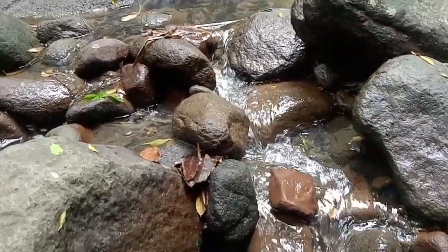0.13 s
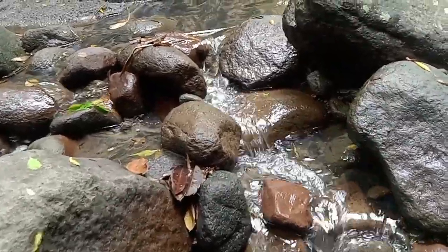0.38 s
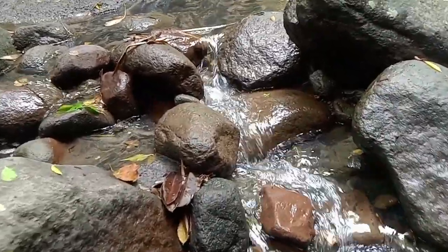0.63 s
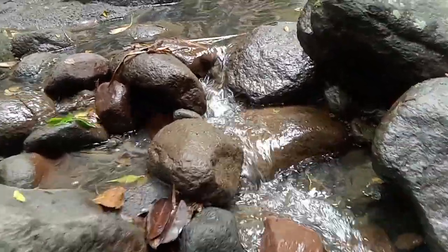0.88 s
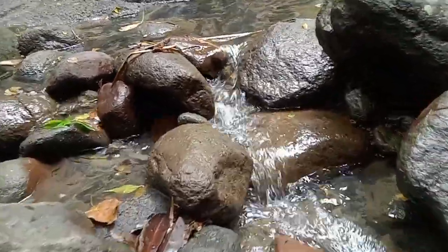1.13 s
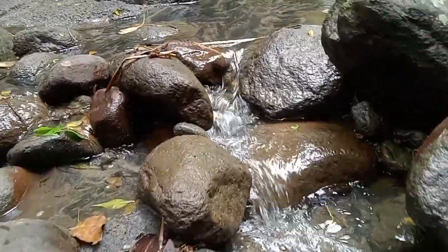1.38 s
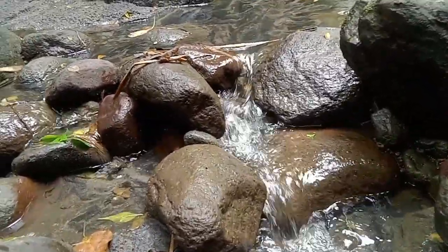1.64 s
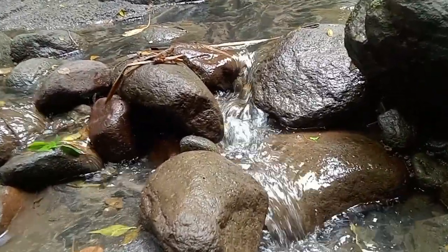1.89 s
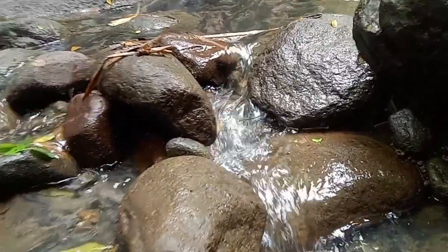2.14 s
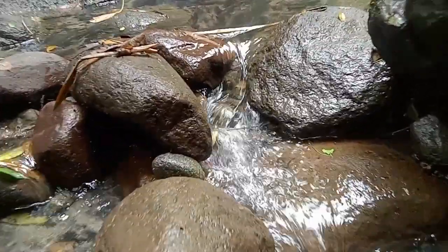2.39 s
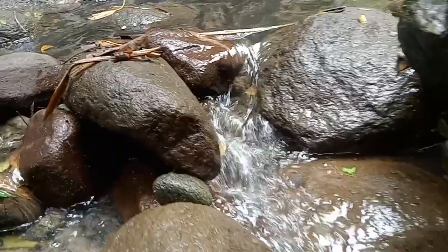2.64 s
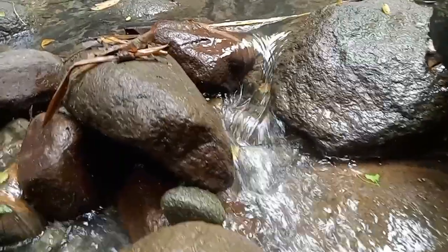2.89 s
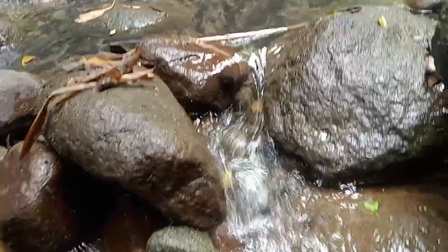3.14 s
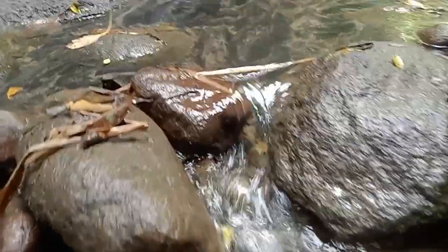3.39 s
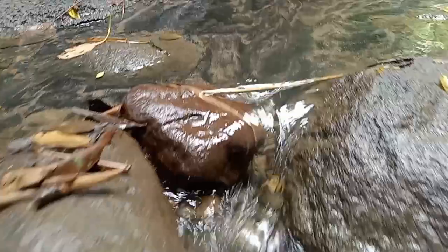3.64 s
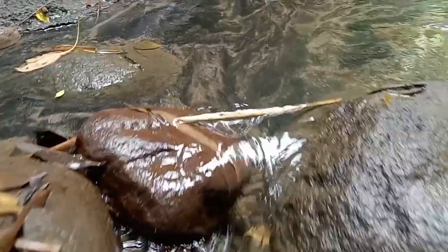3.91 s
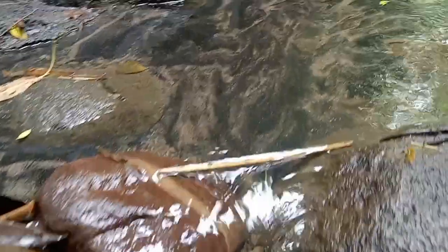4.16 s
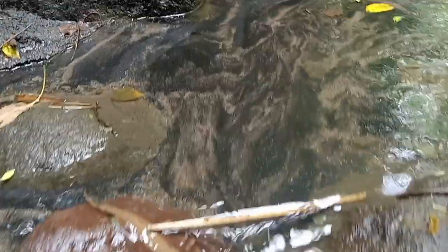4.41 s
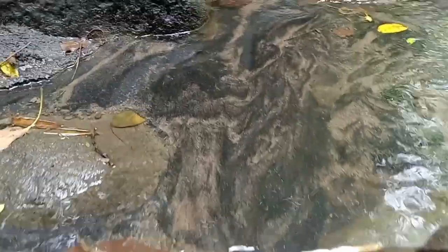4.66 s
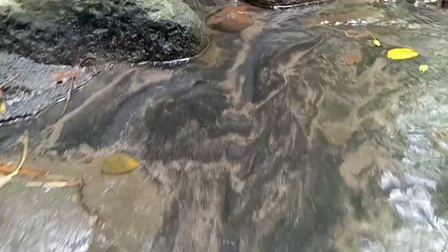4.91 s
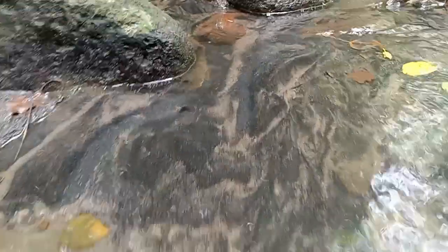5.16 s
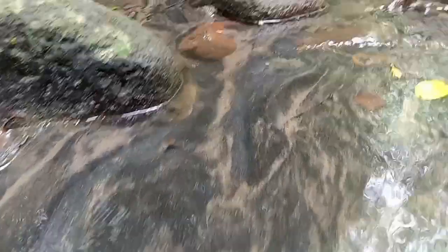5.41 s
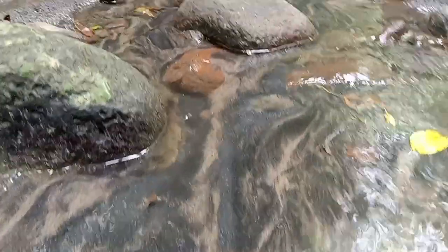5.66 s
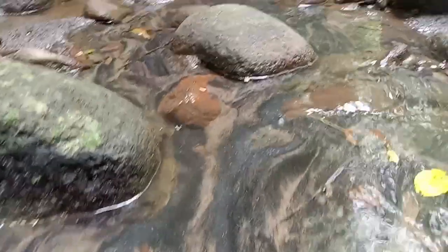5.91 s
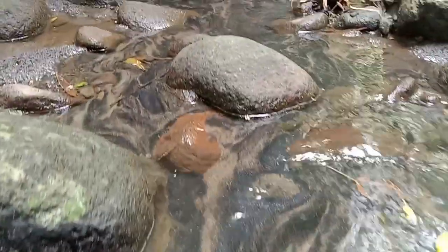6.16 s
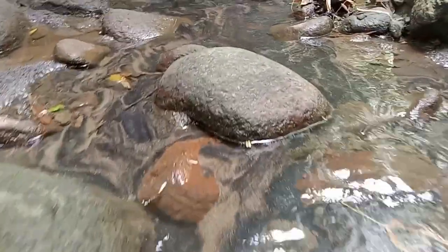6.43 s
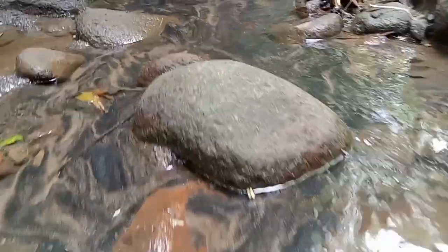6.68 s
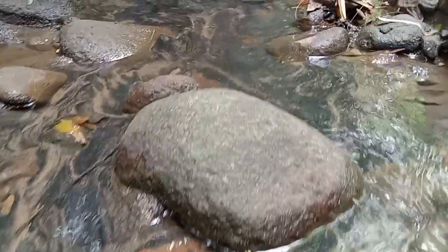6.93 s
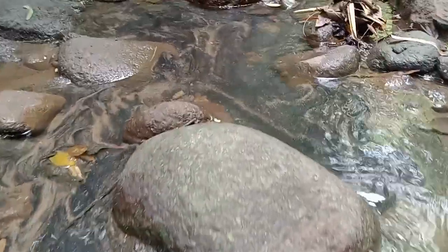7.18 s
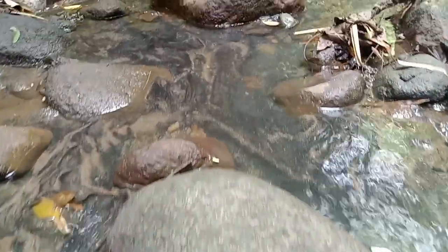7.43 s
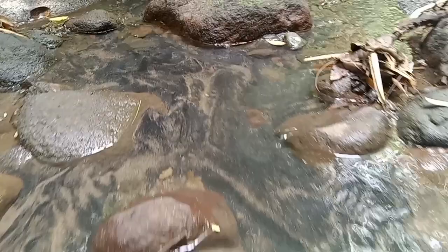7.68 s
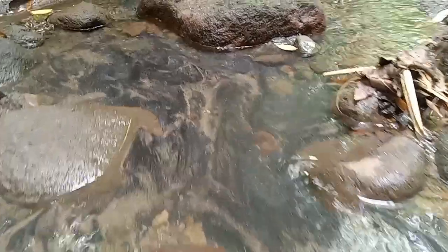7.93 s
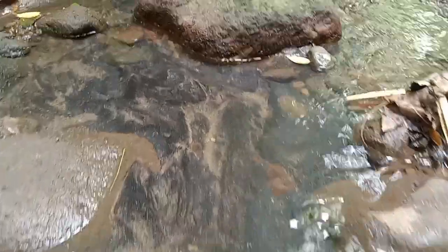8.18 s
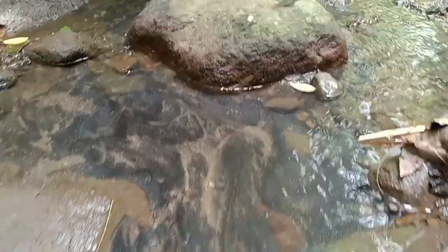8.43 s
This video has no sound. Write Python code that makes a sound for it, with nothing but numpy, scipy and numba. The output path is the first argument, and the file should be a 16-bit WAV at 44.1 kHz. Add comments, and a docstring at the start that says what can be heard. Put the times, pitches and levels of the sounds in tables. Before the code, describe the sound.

Close, low microphone carried up a shallow rocky brook outdoors. Quick glassy bubble tones and ticks trickle irregularly, with rounder plops joining as a little fall is passed. A dense, loud clatter of splashes and gulps peaks after the middle, then drops away to calm water with only occasional plinks. Soft far water noise and a steady high insect haze become easier to hear at the end.

```python
"""Bubbles of every size ring in a shallow stony stream as a small microphone is carried low up it.
It passes a little fall, then calmer water. Each bubble is a short fading tone; slops bunch them in time.
Single loud bubbles plink, and large air pockets gulp. Distant water is coloured noise.
Insects are a noisy far chorus plus thin wavering tones. A faint low hum comes and goes."""
import sys
import numpy as np
from scipy import signal
from scipy.fft import rfft, irfft
from scipy.io import wavfile
from scipy.ndimage import uniform_filter1d
from numba import njit

SR = 44100
rng = np.random.default_rng(int(sys.argv[2]) if len(sys.argv) > 2 else 0)


def boost_factor(decibels):
    """Convert a level in decibels to a linear amplitude factor."""
    exponent = np.asarray(decibels, float) / 20
    return 10 ** exponent


def materialize(psi):
    """Save the field psi as 16-bit PCM at rate SR to the path in sys.argv[1].

    A 1-D psi becomes a single channel; in a 2-D psi each row is a channel.
    """
    bounded = np.clip(np.atleast_2d(psi).T, -1, 1)
    quanta = np.round(bounded * 32767).astype(np.int16)
    wavfile.write(sys.argv[1], SR, quanta)


N = 377540  # length of the scene [samples]

# How busily the near water makes bubbles between slops, as the microphone moves along; base levels:
# (time [s], large [dB], middling [dB], small [dB], tiny [dB])
CHURN = [(0.0, -77, -38.5, -59.5, -44), (0.48, -68, -39, -49, -42), (1.0, -76.5, -38.5, -48.5, -41),
         (1.5, -57.5, -30.5, -43, -33), (2.0, -64, -41.5, -42, -43.5), (2.5, -62, -35, -50.5, -43),
         (3.1, -74.5, -36, -41, -36.5), (3.35, -62, -34, -43.5, -37.5), (3.75, -51.5, -31.5, -40.5, -35),
         (4.1, -39.5, -30, -35, -37), (4.3, -75.5, -28, -35, -34.5), (4.85, -71, -34, -38, -37.5),
         (5.0, -34.5, -31, -28, -28.5), (5.5, -59.5, -36, -29.5, -38.5), (5.95, -64, -42.5, -38, -39.5),
         (6.5, -47.5, -44, -37.5, -37), (6.75, -62.5, -43.5, -47.5, -49.5), (7.6, -65, -57, -47, -47),
         (8.0, -77.5, -54.5, -52, -57), (8.56, -78, -52, -54.5, -59.5)]
# Pitches that stand for the four sizes: (large [Hz], middling [Hz], small [Hz], tiny [Hz])
CHURN_HZ = (320, 1300, 3000, 4800)
# Slops of water over a stone, each a brief surge of bubbles, or a lull where negative:
# (peak time [s], length [s], lift of large bubbles [dB], lift of the rest [dB])
SLOPS = [(0.08, 0.05, 15, 7), (0.396, 0.078, 17, 3), (0.617, 0.1, 19, 12.5), (1.316, 0.71, -4, -3.5),
         (1.87, 0.18, 4, 12.5), (2.051, 0.065, 24.5, 14), (2.224, 0.29, 11.5, 10.5),
         (2.635, 0.061, -10, 12), (2.753, 0.12, 24, 7.5), (2.931, 0.073, 26.5, 2.5), (3.242, 0.066, 4, 5.5),
         (3.529, 0.22, 32, 11.5), (3.962, 0.078, -1, 6.5), (4.15, 0.12, 11, 2.5), (4.416, 0.29, 29, -3.5),
         (4.56, 0.053, 13, -7), (4.606, 0.047, 24.5, 1.5), (4.936, 0.044, -11, 10.5),
         (5.155, 0.074, 22.5, 4.5), (5.407, 0.17, 27.5, 4.5), (6.158, 0.13, 24.5, -1.5),
         (6.797, 0.025, 23.5, 10), (7.492, 0.017, -32, 13), (7.759, 0.22, -1, 10), (8.352, 0.042, 8, 12)]
SLOP_RISE = 0.41  # share of a slop's length spent rising
# How pitch changes the loudness of a crowd bubble: (pitch [Hz], level change [dB])
CROWD = [(150, -26), (350, -3), (800, -3.5), (2400, -1), (5500, 9), (9000, 5.5)]
LINGER = 1.7  # stretches every bubble's cycles of ring

# Colour of the distant water: (pitch [Hz], relative level [dB])
WASH = [(24, -50), (40, -20), (95, -13), (422, -21), (959, -4), (1220, -9), (1680, 1), (1960, -6),
        (3740, -6), (7000, -13), (9100, -43), (15400, -120)]
WASH_DB = -57  # overall level [dB rms]

# Colour of the far insect chorus: (pitch [Hz], relative level [dB])
CHORUS = [(4240, -39), (7200, -17), (8120, 2.5), (8710, 1.5), (9300, -2), (10400, -22), (13600, -45.5),
          (22000, -120)]
CHORUS_DB = -47  # overall level [dB rms]
# Nearer single insects, around which pitch and level waver: (pitch [Hz], peak level [dB])
SINGERS = [(7892, -61), (8140, -52.5), (8656, -53.5), (8947, -57), (9324, -61.5)]

# The loudest bubbles and air pockets, before the ring is stretched; they crest about a cycle early:
# (time [s], peak level [dB], pitch [Hz], ring [cycles])
LOUD = [(0.081, -36, 600, 14), (0.193, -32, 1115, 19), (0.197, -25.5, 2040, 19), (0.272, -18, 5100, 4.1),
        (0.3461, -31, 1150, 17), (0.526, -31.5, 737, 11), (0.5476, -18, 4840, 7), (0.6156, -13, 5870, 4.1),
        (0.79, -22.5, 5500, 26), (0.847, -30.5, 2430, 17), (0.94, -16, 5460, 5.7), (1.03, -33.5, 892, 16),
        (1.1437, -19.5, 6000, 9), (1.155, -18.5, 6200, 9.9), (1.1474, -29, 1830, 26),
        (1.158, -29.5, 1310, 16), (1.217, -32.5, 1600, 25), (1.2918, -29, 960, 30),
        (1.324, -28, 1020, 11.5), (1.437, -29.5, 3360, 30), (1.451, -20, 5450, 13), (1.559, -33, 945, 36),
        (1.872, -25, 2060, 13), (1.9363, -10, 5000, 3.9), (1.999, -31.5, 960, 23), (2.0582, -14, 2460, 3.6),
        (2.294, -32, 1030, 13), (2.461, -15.5, 6050, 19), (2.5363, -24, 1086, 34), (2.543, -43.5, 199, 5),
        (2.615, -31.5, 528, 10.6), (2.647, -22, 975, 9.1), (2.759, -15, 1250, 5.8), (2.84, -28, 746, 17.5),
        (3.2124, -26.5, 438, 2.6), (3.253, -27.5, 1426, 21), (3.301, -22.5, 1820, 13),
        (3.378, -17.5, 5320, 11), (3.409, -19, 1660, 10), (3.4144, -38, 247, 11), (3.492, -14.5, 1120, 5.5),
        (3.5074, -10.5, 2540, 4.4), (3.538, -18, 1650, 7.5), (3.5783, -18, 1040, 5),
        (3.582, -8.5, 2000, 4.9), (3.5898, -15.5, 5150, 14), (3.659, -15.5, 1950, 4.6),
        (3.66, -14, 5540, 24), (3.746, -21.5, 2530, 9.9), (3.768, -17.5, 2000, 3.6),
        (3.866, -24.5, 1270, 7.1), (3.9687, -18.5, 730, 6.5), (4.1264, -12.5, 1900, 7.9),
        (4.128, -19, 5100, 15), (4.17, -23.5, 1296, 17.7), (4.2368, -19.5, 1720, 8.4),
        (4.261, -19.5, 1630, 21), (4.3038, -26, 491, 5.3), (4.305, -24, 1710, 16.4), (4.361, -30, 2800, 12),
        (4.401, -29.5, 820, 13), (4.419, -27.5, 1100, 14), (4.451, -23, 2680, 11),
        (4.477, -27.5, 1260, 6.8), (4.496, -26, 3900, 5.8), (4.505, -18.5, 4000, 5.5),
        (4.618, -16, 4430, 9.4), (4.631, -16, 2500, 5), (4.688, -29.5, 1730, 12), (4.722, -25, 720, 6),
        (4.7669, -15.5, 6400, 9.9), (4.857, -19, 3590, 24), (4.881, -21.5, 3650, 16),
        (4.927, -3.5, 3410, 5), (4.931, -15, 690, 5.9), (4.939, -25, 4940, 9.3), (4.9708, -12.5, 792, 7.6),
        (4.971, -5, 1730, 1.36), (5.036, -11, 4570, 5.6), (5.043, -23, 503, 16), (5.056, -7, 7450, 8.3),
        (5.0836, -3, 5530, 7.5), (5.1212, -12.5, 3040, 10.2), (5.1758, -7, 1820, 0.99),
        (5.1761, -9.5, 3850, 4.1), (5.197, -13.5, 1973, 21.2), (5.3405, -16.5, 520, 0.98),
        (5.349, -13, 5500, 36), (5.3513, -5.5, 588, 1.3), (5.372, -7, 4000, 3.8), (5.3727, -9, 420, 0.82),
        (5.381, -12, 5600, 20), (5.3858, -14, 370, 1.5), (5.394, -19.5, 3620, 8.8), (5.3969, -7, 536, 2.5),
        (5.4, -12, 5600, 7.3), (5.417, -24, 5300, 22), (5.522, -7.5, 3060, 8.4), (5.538, -8.5, 3900, 3.5),
        (5.5698, -2.5, 3500, 1.3), (5.5805, -5.5, 6900, 6.5), (5.611, -14.5, 3530, 8),
        (5.655, -4, 2626, 14), (5.6723, -11.5, 3800, 9.2), (5.74, -10, 3690, 4.1), (5.8568, -11, 6800, 4.8),
        (5.936, -10.5, 4680, 7.9), (6.104, -26, 1860, 3.1), (6.182, -25, 1780, 12.7),
        (6.204, -32, 1045, 16), (6.415, -28.5, 377, 2.3), (6.4845, -12, 2880, 13.4),
        (6.496, -32.5, 288, 2.8), (6.5486, -32.5, 913, 13.5), (6.784, -39, 370, 5.8),
        (6.896, -31.5, 1660, 8.2), (7.124, -40.5, 806, 31), (7.162, -41, 820, 14.7),
        (7.314, -34, 1680, 6.8), (7.42, -40.5, 1280, 18), (7.486, -20.5, 4400, 3.3),
        (7.742, -16.5, 4880, 11), (7.756, -24.5, 2260, 13), (7.77, -12, 6500, 5.8), (7.827, -20, 5340, 4.4),
        (7.91, -35, 1650, 10.5), (8.17, -43, 1520, 12), (8.277, -33, 5430, 32), (8.387, -23, 570, 1.36)]

# Air pockets gulping shut between stones, before the shared boost: (start [s], peak level [dB], pitch [Hz])
GULPS = [(0.241, -48.5, 456), (2.895, -43, 450), (3.531, -35, 277), (3.603, -29, 287), (3.66, -34.5, 380),
         (3.763, -37, 335), (3.791, -36.5, 294), (3.916, -30, 370), (3.965, -29, 335), (4.029, -34, 374),
         (4.602, -45, 335), (4.878, -32.5, 386), (5.138, -32, 427), (5.18, -27.5, 338), (5.503, -42, 308),
         (6.114, -38.5, 454), (7.734, -46, 370)]
GULP_CYCLES, GULP_RISE, GULP_DB = 1.5, 0.23, 5  # ring before stretching [cycles], swell [cycles], boost [dB]

# Swells of the low hum: (middle [s], length [s], level at the middle [dB rms])
THRUM = [(3.204, 0.068, -67), (3.454, 0.021, -55), (3.555, 0.047, -55.5), (3.946, 0.021, -53),
         (4.104, 0.16, -61.5), (4.387, 0.043, -58), (5.146, 0.19, -77), (5.425, 0.55, -65),
         (5.988, 0.19, -60.5), (6.27, 0.11, -54), (6.454, 0.069, -61.5), (7.152, 0.24, -69.5),
         (7.386, 0.22, -66.5)]

# Roll-offs of the microphone for the near water: (pitch [Hz], gain [dB])
MIC = [(30, -11.5), (120, -0.5), (300, 1), (7000, 0), (8500, 0), (9800, -13), (10800, -39.5), (12000, -63)]


def evened(x):
    """Scales to an average strength (rms) of 1."""
    return x / np.sqrt(np.mean(x ** 2) + 1e-20)


def read(points, hz):
    """Reads a curve of levels between its points, with pitch on a log scale."""
    f, value = np.transpose(points)
    return np.interp(np.log(hz + 1), np.log(f + 1), value)


def drift(count, hz):
    """Slow chance: rows of noise smoothed to about hz changes a second."""
    width = int(SR / hz)
    noise = rng.standard_normal((count, N))
    return evened(uniform_filter1d(uniform_filter1d(noise, width), width))


def hiss(spectrum, patchy_db, span_bins, span_frames):
    """Noise of a given colour with drifting louder and softer patches."""
    a, b, patches = rng.standard_normal((N // 256 + 5, 513, 3)).T
    patches = uniform_filter1d(patches, max(int(span_bins), 1), 0)  # smooth across pitch
    patches = evened(uniform_filter1d(patches, max(int(span_frames), 1), 1))  # smooth along time
    colour_db = read(spectrum, np.fft.rfftfreq(1024, 1 / SR))[:, None]
    z = (a + 1j * b) * boost_factor(colour_db + patchy_db * patches)
    return evened(signal.istft(z, nperseg=1024, noverlap=768)[1][:N])


@njit
def add(mix, start, peak, step, cycles, glide, rise):
    """Adds bubbles: sines that swell softly, fade, are cut short as they burst, and slide near the surface."""
    for k in range(len(start)):
        turns = 0.
        end = min(len(mix), start[k] + int(cycles[k] / step[k]))
        for n in range(max(start[k], 0), end):
            age = (n - start[k]) * step[k]  # in cycles
            turns += step[k] * (1 + glide[k] * age / cycles[k])
            swell = (1 - np.exp(-age / rise[k])) ** 2
            fade = np.exp(-np.pi * age / cycles[k] - (2 * age / cycles[k]) ** 4)
            mix[n] += peak[k] * swell * fade * np.sin(2 * np.pi * turns)


def ring(s, db, hz, cycles, glide, rise):
    """Sums a list of bubbles, each swelling to its level db at about its time s, then dying away."""
    mix, one = np.zeros(N), np.ones(len(s))
    cycles = np.clip(cycles * one, 1, 90)
    rise = np.clip(rise * one, .02, 30)
    cycles = LINGER * cycles + 2 * rise
    # cycles from birth to the loudest moment, and the height of the swell there
    crest = np.minimum(rise * np.log(1 + 2 * cycles / (np.pi * rise)), cycles / 3)
    height = (1 - np.exp(-crest / rise)) ** 2 * np.exp(-np.pi * crest / cycles - (2 * crest / cycles) ** 4)
    start = ((s - crest / hz) * SR).astype(np.int64)
    add(mix, start, boost_factor(db) / height, hz / SR, cycles, glide * one, rise)
    return mix


def churn(s, surge_share):
    """Base levels of the four bubble sizes at times s: the steady churn, lifted or lowered by each slop."""
    t, *levels = np.transpose(CHURN)
    peak, length, large_db, rest_db = np.transpose(SLOPS)[:, :, None]
    side = np.where(s < peak, SLOP_RISE, 1 - SLOP_RISE) * length
    surge = surge_share * np.exp(-((s - peak) / side) ** 2)
    lifts = [(db * surge).sum(0) for db in (large_db, rest_db, rest_db, rest_db)]
    return [np.interp(s, t, db) + lift for db, lift in zip(levels, lifts)]


def bubbles(count, low_hz, high_hz, spread_db, clump_db, clump_hz, cycles, share_db, pockets=0, surge_share=1):
    """A random crowd of bubbles: few are loud, they bunch in time, and the churn sets each size's level."""
    when, pitch, size, long, slide, swell = rng.random((count, 6)).T
    s, at = when * N / SR, (when * N).astype(int)
    if pockets:  # each hollow between stones sheds a chain of like-sized bubbles whose pitch wanders
        hollow = (pitch * pockets).astype(int)
        wander = 0.44 * drift(count=pockets, hz=12)[hollow, at]
        pitch = (hollow + .5 + wander) / pockets
    hz = low_hz * (high_hz / low_hz) ** pitch

    # blend the churn levels of the two nearest sizes
    place = np.interp(np.log(hz), np.log(CHURN_HZ), np.arange(len(CHURN_HZ)))
    churn_db = sum(db * np.maximum(1 - abs(place - k), 0) for k, db in enumerate(churn(s, surge_share)))

    # bunching is partly shared by all sizes, partly apart for each third of the pitch range
    slop = drift(count=4, hz=clump_hz)
    third = np.clip(3 * pitch, 0, 2).astype(int)
    clump = .92 * slop[0, at] + .4 * slop[1 + third, at]
    bunching_db = clump_db * 2.06 * np.tanh(clump / 2.39)  # extremes are held back

    big_db = -spread_db * np.log(1 - .98 * size)  # few bubbles are loud
    db = churn_db + read(CROWD, hz) + big_db + bunching_db + share_db
    cycles = cycles * np.minimum(hz / 600, 1)  # the largest bubbles ring for fewer cycles
    return ring(s, db, hz, cycles * (.5 + 1.06 * long), glide=0.45 * (slide - .3),
                rise=.9 + .3 * cycles * swell ** 2)


def spray():
    """A dense crowd of mostly high bubbles in quick clumps."""
    return bubbles(count=11000, low_hz=1730, high_hz=9110, spread_db=3.0, clump_db=5.5, clump_hz=68.8,
                   share_db=-12, cycles=10)


def fizz():
    """An even crowd of bubbles of every size, low to high."""
    return bubbles(count=10000, low_hz=105.8, high_hz=8120, spread_db=3.5, clump_db=1.5, clump_hz=30,
                   share_db=-12.5, cycles=8)


def gurgle():
    """Seven hollows between stones shed chains of bubbles, each chain near its own wandering pitch."""
    return bubbles(count=4000, low_hz=420, high_hz=4200, spread_db=3.5, clump_db=3.0, clump_hz=35.0,
                   share_db=-5.5, cycles=13, pockets=7, surge_share=.55)


def ticks():
    """Droplets landing: a sparse crowd of bubbles that die after a few cycles."""
    return bubbles(count=700, low_hz=1600, high_hz=5960, spread_db=4.5, clump_db=4.0, clump_hz=30.2,
                   share_db=-3.5, cycles=3)


def wash():
    """Distant water: many splashes blur into coloured noise with gentle patches."""
    return boost_factor(WASH_DB) * hiss(WASH, patchy_db=2.2, span_bins=8, span_frames=8)


def insects():
    """A blurred far chorus of noise, and single singers whose thin notes waver and swell."""
    hz, db = np.transpose(SINGERS)[:, :, None]
    turns = np.cumsum(hz + 13 * drift(count=len(SINGERS), hz=24.8), 1) / SR
    level = boost_factor(db + 2.0 * drift(count=len(SINGERS), hz=27))
    notes = level * np.sin(2 * np.pi * turns)
    chorus = boost_factor(CHORUS_DB) * hiss(CHORUS, patchy_db=5.5, span_bins=1.5, span_frames=11)
    return notes.sum(0) + chorus


def loud_bubbles():
    """Standout plinks and gulps: a ring, a short higher snap as the neck closes, a litter of small bubbles."""
    s, db, hz, cycles = np.transpose(LOUD)
    body = ring(s - 0.98 / hz, db, hz, cycles, glide=0.077, rise=0.19 + 0.15 * cycles)
    snap = ring(s - 1 / hz, db - 18, 2 * hz, 3, glide=.05, rise=.6)

    # twelve small bubbles around each loud one, weaker the later they come
    late, pitch, size = rng.random((len(LOUD), 12, 3)).T
    litter_s = s - .004 + .035 * late ** 2
    litter_db = db - 11 - 9 * late - 6 * size
    litter_hz = np.minimum(hz * 3.5 ** (pitch - .4), 8500)
    litter_cycles = np.minimum(cycles + 0 * late, 7.0)
    litter = ring(litter_s.ravel(), litter_db.ravel(), litter_hz.ravel(), litter_cycles.ravel(),
                  glide=0.37, rise=0.96)
    return body + snap + litter


def gulps():
    """Large pockets of air that thud shut and barely ring."""
    s, db, hz = np.transpose(GULPS)
    return ring(s + 1.2 / hz, db + GULP_DB, hz, GULP_CYCLES, glide=0.047, rise=GULP_RISE)


def thrum():
    """A faint low hum near 96 Hz, blurred by wavering pitch and strength, that comes in short swells."""
    t = np.arange(N) / SR
    level = sum(boost_factor(db) * np.exp(-(2 * (t - s) / length) ** 4) for s, length, db in THRUM)
    a, b, c = drift(count=3, hz=45)
    turns = np.cumsum(96 + 4 * c) / SR
    hum = (1 + .6 * a) * np.sin(2 * np.pi * turns) + .6 * b * np.cos(2 * np.pi * turns)
    return level * evened(hum)


def stones(x):
    """Short, faint scatter off wet rocks and banks: a quickly fading burst of random echoes."""
    t = np.arange(int(.08 * SR)) / SR
    taps = rng.standard_normal(len(t)) * boost_factor(-60 * t / .07) * (t > .003)  # echoes begin after 3 ms
    return x + boost_factor(-11) * signal.oaconvolve(x, taps / np.linalg.norm(taps))[:N]


def microphone(near):
    """Rounds off the closest plinks, then weakens the lowest and highest pitches."""
    near = 1.4 * np.tanh(near / 1.4)
    gain = boost_factor(read(MIC, np.fft.rfftfreq(N, 1 / SR)))
    return irfft(rfft(near) * gain, N)


def scene():
    """Near water through the microphone's roll-offs, over the far sounds."""
    crowd = spray() + fizz() + gurgle() + ticks()
    near = microphone(stones(crowd + loud_bubbles() + gulps()))
    return (near + wash() + insects() + thrum())[None]


def low_pass(x):
    """Removes everything above the highest recorded frequency."""
    return signal.sosfilt(signal.butter(12, 11700, fs=SR, output="sos"), x)


def record(dry):
    """Turns the finished mix into the sound to be saved."""
    return low_pass(dry)


dry = scene()
out = record(dry)
materialize(out)
```